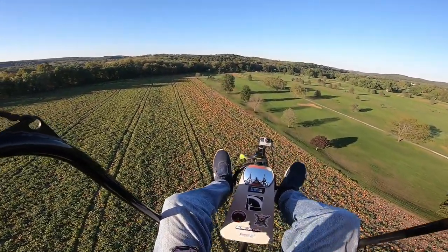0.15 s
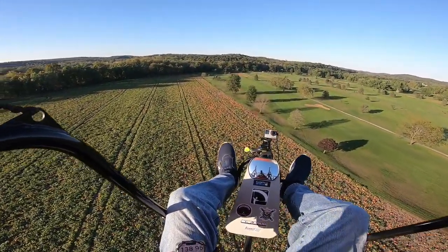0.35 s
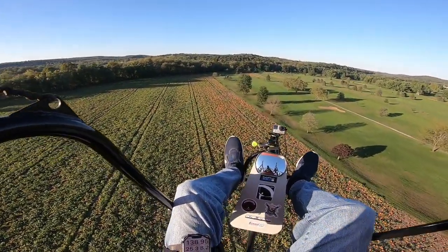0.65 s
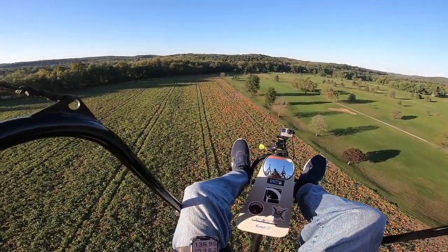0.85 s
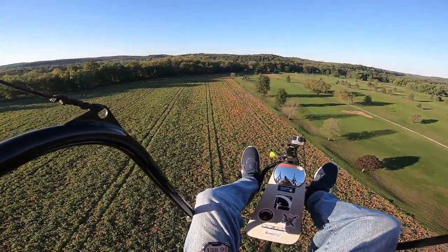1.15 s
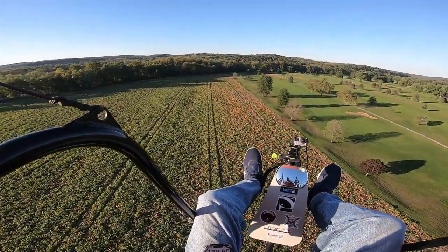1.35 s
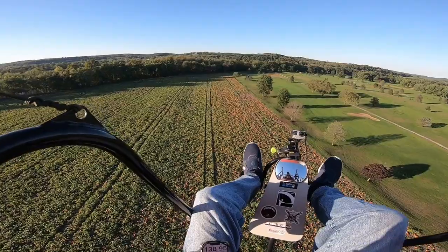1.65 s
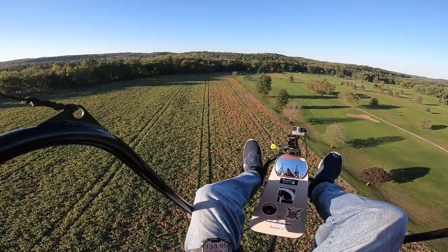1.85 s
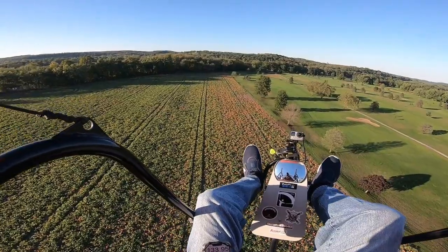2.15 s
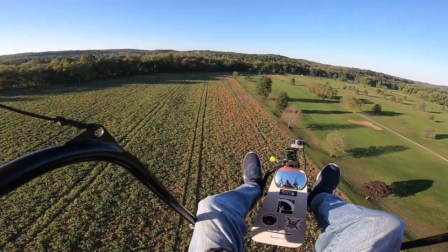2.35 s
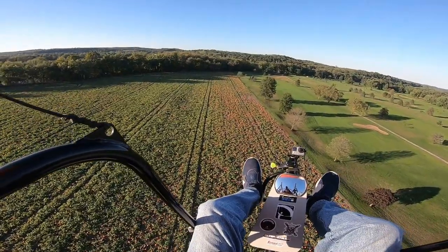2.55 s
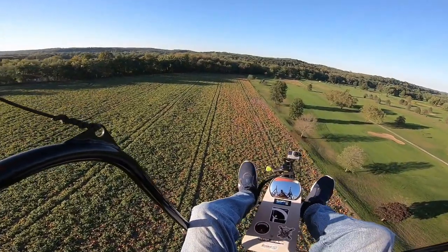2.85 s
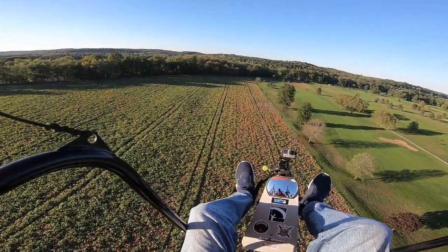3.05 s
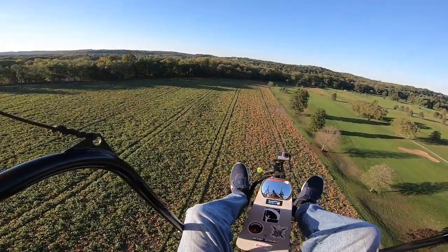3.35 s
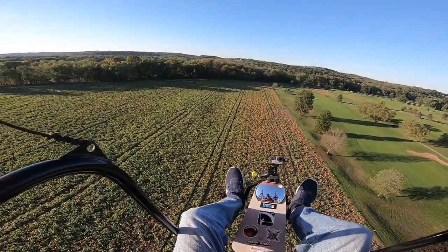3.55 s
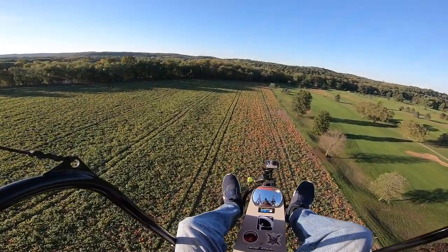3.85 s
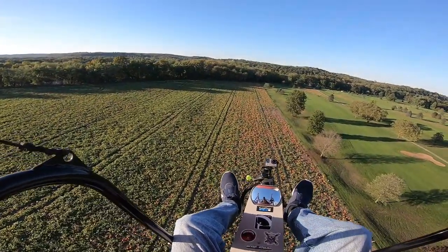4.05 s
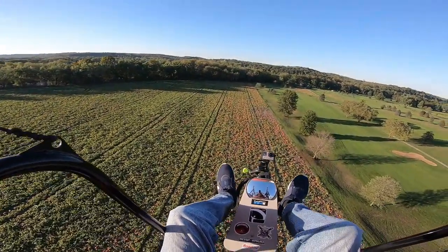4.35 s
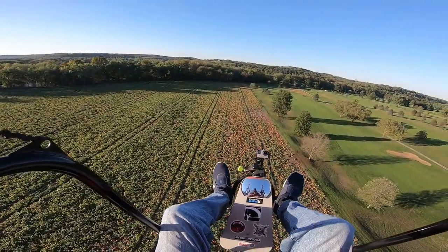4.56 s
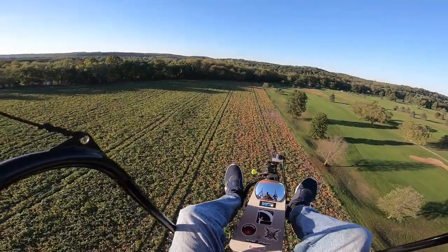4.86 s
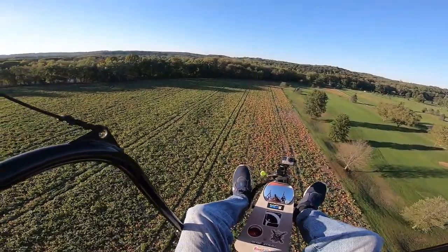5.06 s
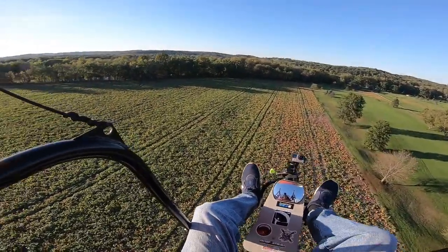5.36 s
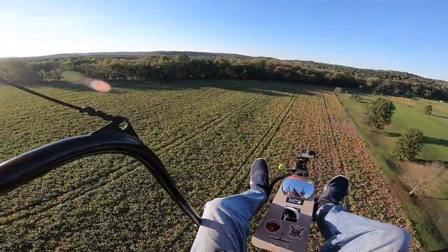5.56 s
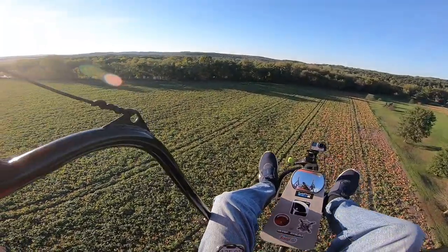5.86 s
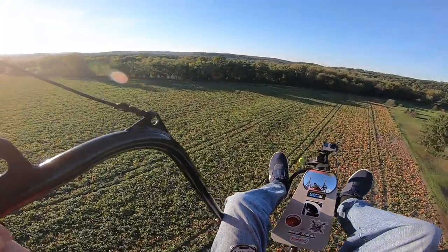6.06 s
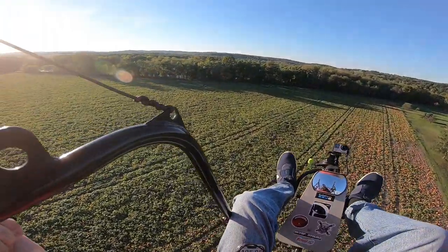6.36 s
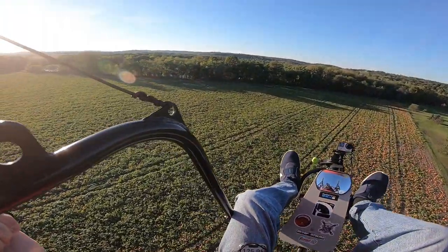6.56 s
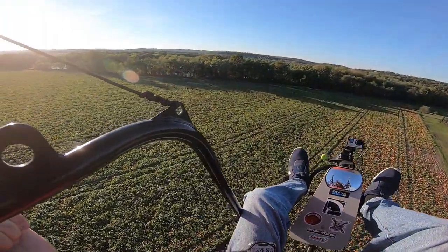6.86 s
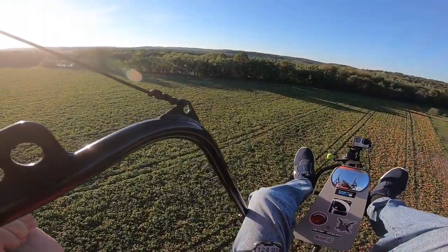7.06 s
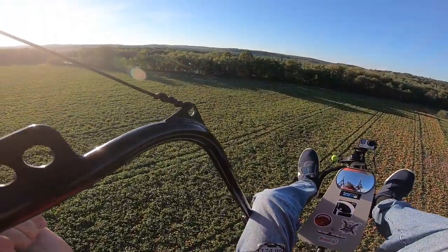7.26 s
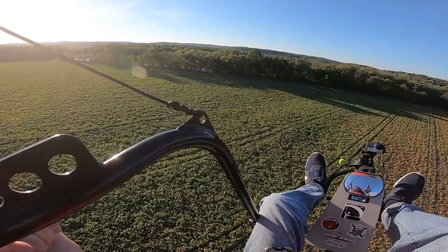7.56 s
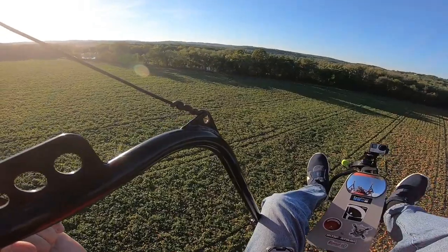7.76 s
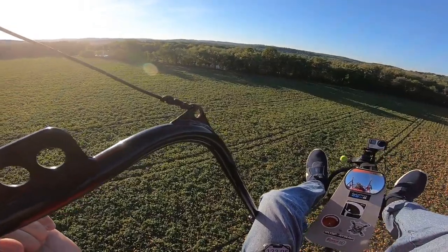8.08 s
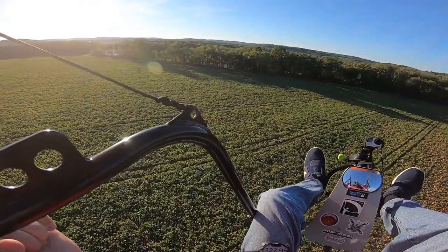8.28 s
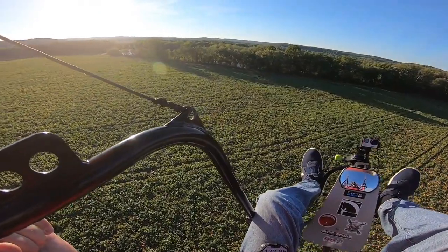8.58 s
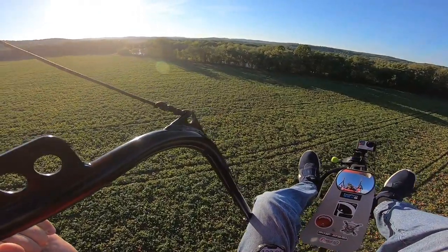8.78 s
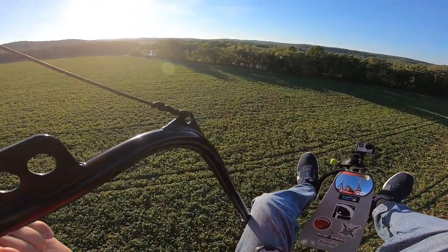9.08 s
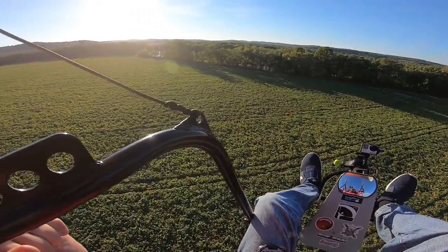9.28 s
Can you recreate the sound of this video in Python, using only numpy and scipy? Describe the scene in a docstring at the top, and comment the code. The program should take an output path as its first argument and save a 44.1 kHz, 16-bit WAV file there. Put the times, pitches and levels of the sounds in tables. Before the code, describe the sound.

Continuous small-engine drone in open air, boxy and muffled on top as through a pilot's headset. A fast, rasping two-stroke bark rides on low, fluttering propeller roar. Revs ease down gently, bottom out late, and recover to the starting pitch. Brief link gaps make little ticks and pitch kinks, several sharp static snaps come mid-way, and thin electronic hiss and buzz stay underneath.

```python
"""A paramotor cruises low over fields, heard through the narrow band of a helmet intercom.
From the start the two-stroke exhaust cracks once a turn, built from harmonics, over a rasp of gas noise.
The geared-down propeller chops noise into a rough wash; the speed sags until about 6.8 s, then recovers.
The drone turns hollow near 1.3, 4.1 and 9 s, and slightly near 6.7 s; crackles come between 4 and 7 s.
Short link dropouts, with a soft bump and a kink in pitch, pause from 4.1 to 6.6 s; hiss and buzz stay on."""
import sys
import numpy as np
from scipy import signal
from scipy.fft import rfft, irfft, next_fast_len
from scipy.io import wavfile
from scipy.ndimage import uniform_filter1d

SR = 44100
rng = np.random.default_rng(int(sys.argv[2]) if len(sys.argv) > 2 else 0)


def inscribe(sig):
    """Save sig as 16-bit PCM at rate SR to the path in sys.argv[1].

    A 1-D sig is mono; a 2-D sig holds one channel per row.
    Samples are clipped to [-1, 1] before scaling.
    """
    pcm = np.round(np.clip(np.atleast_2d(sig).T, -1, 1) * 32767)
    wavfile.write(sys.argv[1], SR, pcm.astype(np.int16))


N = 415422
TIME = np.arange(N) / SR

# engine speed, eased back slowly and then opened up again: t/s, firings per second f/Hz
ENGINE_SPEED = [(0.0, 122.68), (0.55, 121.52), (1.3, 119.95), (2.3, 119.08), (3.8, 116.95), (4.05, 115.92),
                (4.55, 115.07), (5.3, 114.7), (5.8, 114.22), (6.3, 112.9), (6.8, 112.87), (7.55, 114.03),
                (7.8, 114.9), (8.5, 117.6), (8.8, 120.05), (9.42, 123.12)]
# tone colour of the exhaust crack: f/Hz, level/dB
EXHAUST_COLOUR = [(110, -31.5), (240, -22), (360, -19), (470, -19), (570, -0.5), (1300, -2.7), (1600, -2),
                  (2100, -7.8), (2700, -11.8), (3500, -17)]
# tone colour of the low slipstream roar: f/Hz, relative level/dB (per Hz)
WASH_COLOUR = [(25, -32), (70, -22.5), (105, -15), (165, -3.5), (240, 1), (290, -2.5), (400, -18.5),
               (900, -14.5), (3400, -32.5)]
# tone colour of the air churned by the blades: f/Hz, relative level/dB (per Hz)
CHURN_COLOUR = [(100, -23.5), (240, -7), (320, 2), (410, 2.5), (530, -5), (800, -11), (1300, -12),
                (3400, -25.5)]
# tone colour of the exhaust gas rasp: f/Hz, relative level/dB (per Hz)
RASP_COLOUR = [(150, -15.5), (450, -8.5), (900, -1.5), (1400, -4), (1900, -7), (2600, -10), (3300, -10),
               (3600, -19)]
# tone colour of the electronic hiss: f/Hz, relative level/dB (per Hz)
HISS_COLOUR = [(1000, -57), (4500, 2.5), (8000, 1), (8350, 1), (8570, 5.5), (8800, 0.5), (11000, -0.5),
               (15000, -0.5)]
# tone colour of the electronic buzz: f/Hz, relative level/dB (per Hz)
BUZZ_COLOUR = [(4000, -17), (10000, -18), (12400, -13), (13800, -15), (14350, -10), (14650, -2), (15250, 0),
               (15450, -30)]
# strength of the buzz before each side's own offset: t/s, level/dB
BUZZ_LEVEL = [(0, -75), (2.5, -77), (5.5, -73.5), (8, -71.5), (9.42, -75)]
# breaks in the link, mostly on a half-second beat:
# t/s, length/s, bump level/dB before smoothing, lateness of the sound afterwards/s
LINK_DROPOUTS = [(0.051, 0.0026, -49, 0.0042), (0.061, 0.0074, -32, 0.003), (0.556, 0.0041, -46, 0.0025),
                 (0.57, 0.0056, -35, 0.0019), (1.055, 0.0032, -28, 0.0013), (1.554, 0.0047, -45, .0042),
                 (2.055, 0.0039, -33, 0.0029), (2.554, 0.0035, -32, 0.0012), (3.061, 0.0041, -32, 0.0032),
                 (3.555, 0.0036, -42, 0.0037), (3.566, 0.0043, -36, 0.0017), (4.055, 0.0065, -19.5, 0.0037),
                 (4.093, 0.0023, -30, 0.00207), (6.648, 0.017, -32, .0032), (7.053, 0.0022, -40, 0.00072),
                 (7.56, 0.0042, -27, 0.0035), (8.055, 0.0037, -32, 0.0025), (8.553, 0.0037, -37, 0.0029),
                 (9.061, 0.0036, -44, 0.0031)]
# crackles and knocks on the line, levels before filtering:
# t/s, snap level/dB, tail level/dB, tail decay/s, centre f/Hz, width/octaves
LINE_CRACKLES = [(4.063, -17, -29, 0.076, 652, 1), (4.9548, -12.5, -35, .003, 1090, 1.2),
                 (5.3565, -19.5, -39, .003, 1300, 3.5), (5.3652, -20, -32, 0.0037, 2860, 0.81),
                 (6.663, -13, -32, 0.004, 1440, 0.87), (6.668, -19, -24, .004, 280, 2.3),
                 (6.8877, -15.5, -40, .003, 900, 1.3)]
# loudness of the exhaust (its bark), before the crack and rasp offsets: t/s, level/dB
BARK_LEVEL = [(0, -42), (1.1, -43.5), (1.45, -47), (2.1, -41.5), (2.7, -43), (3.3, -42), (3.8, -43.5),
              (4.7, -46), (5.4, -43), (5.9, -45.5), (6.5, -44.5), (7, -45.5), (8.3, -45), (9.42, -45.5)]
# loudness of the blade churn, weakest around the slowest stretch: t/s, level/dB
CHURN_LEVEL = [(0, -37), (1.4, -36), (1.9, -36.5), (2.3, -36), (3.6, -38.5), (4.8, -39.5), (5.5, -38.5),
               (5.9, -40), (6.6, -43.5), (8.2, -41.5), (8.9, -38.5)]
# spells in which the drone turns hollow and the wash thins: start t/s, end t/s, depth/0-1
HOLLOW_SPELLS = [(1.337, 2.234, 0.62), (4.144, 5.006, 0.8), (6.715, 7.113, 0.17), (9.02, 9.7, 0.3)]
# strongest exhaust harmonics, before the tone colour:
# multiple of the firing rate, level over the bark/dB, change at full hollowness/dB
DRONE_HARMONICS = [(5, 2.5, -10), (6, -8, 10.5), (7, -3.5, -19), (8, 0.26, -8), (9, -5, 4.5), (10, -4, -3),
                   (11, -4.5, -8.5)]
# level changes of single harmonics: start t/s, end t/s, multiple of the firing rate, change/dB
HARMONIC_SWELLS = [(-0.2, 0.59, 7, -8), (3.0, 3.8, 9, 5.5), (3.0, 3.46, 8, -13), (3.4, 4.3, 11, -14),
                   (3.75, 4.1, 7, 4.5), (4.95, 6.2, 8, 2.5), (5.1, 5.702, 5, 0), (5.1, 6.9, 11, 1),
                   (6.3, 5.8, 11, 11), (7.402, 8.3, 8, -8), (7.5, 8.8, 6, -22), (7.7, 10.6, 13, 3),
                   (8.2, 8.6, 11, 4), (8.9, 11, 4, 22), (-0.2, 3.1, 14, 1.5), (1.9, 3.6, 13, 0.5),
                   (4.9, 7.6, 14, 1.5), (7.4, 7.8, 9, 3), (4.1, 5.14, 12, 3), (8.1, 8.6, 10, 3),
                   (9.1, 9.6, 6, 5)]
# tilt of the exhaust treble, which sets how sharp the crack is: t/s, slope/dB per octave
TREBLE_TILT = [(0, -5), (1.5, -3), (2.3, -3.2), (3.3, -3), (4.2, -5.5), (5.5, -5.5), (7, -12), (8.7, -6),
               (9.42, -7)]

INTERCOM_HZ, CUTOFF_HZ = 3546, 15300  # top of the intercom's band; top of everything heard
LEFT_LAG_MS = 0.12
BUZZ_PULSES_PER_S = 59.945
CATCH_UP_SHARE = .045  # playing this much too fast makes up for the lateness
BLADE_PASSES_PER_FIRING = .923
HOLLOW_FADE_S = 0.27
WASH_DB, WASH_HOLLOW_DB = -37, -3  # usual level; change at full hollowness
JET_DB, CRACK_DB = -.6, -6.6  # the gas rasp and the weaker harmonics, over the bark
SPURT_DB, SPURT_ECHO_DB = 5.5, -3  # the spurt of gas and its echo, over the steady rush
JET_WIDTH_TURNS, JET_ECHO_WIDTH_TURNS = .045, .09  # length of the spurt and of its echo
ECHO_TURNS = .6  # delay of the exhaust echo
CRACK_WIDTH_TURNS, BURN_SCATTER_DB = .07, 2.0  # length of the crack; spread of its strength
TIMING_SCATTER_TURNS = .002
TILT_FROM_MULTIPLE = 11  # harmonics above this one get the treble tilt
LINE_WAVER_DB, LINE_WAVERS_PER_S = 1.0, 1.03


def from_db(db):
    """Turn decibels into a gain."""
    return 10 ** (np.asarray(db) / 20)


def rms_one(x):
    """Scale to unit power."""
    return x / np.sqrt(np.mean(x ** 2) + 1e-20)


def in_time(rows):
    """Read each column of a timed curve at every sample."""
    s, *columns = np.transpose(rows)
    return [np.interp(TIME, s, column) for column in columns]


def drift(rate):
    """Wander smoothly at random with a spread of one, from noise smoothed at every 40th sample."""
    r = np.exp(-80 * np.pi * rate / SR)
    noise = rng.standard_normal(N // 40 + 2002)
    slow = signal.lfilter([1], [1, -2 * r, r * r], noise)[2000:]  # skip the filter's start
    return np.interp(np.arange(N) / 40, np.arange(len(slow)), rms_one(slow))


def colour(x, spectrum):
    """Filter to the given gain curve without any sound ahead of its cause (minimum phase)."""
    size = next_fast_len(N + SR // 10, True) * 2
    hz, db = np.transpose(spectrum)
    bin_hz = np.arange(size // 2 + 1) * SR / size
    gain_db = np.interp(np.log(bin_hz + 1), np.log(hz), db)
    cepstrum = irfft(np.log(from_db(gain_db)))
    # folding the later half away leaves only a response after the cause
    cepstrum[1:size // 2] *= 2
    cepstrum[size // 2 + 1:] = 0
    return irfft(rfft(x, size) * np.exp(rfft(cepstrum)))[..., :N]


def per_cycle(turns):
    """Draw a fresh random value for each cycle, joined by straight lines."""
    values = rng.standard_normal(N // 100)
    return np.interp(turns, np.arange(len(values)), values)


def puffs(turns, sharpness):
    """Swell once a cycle, at unit power."""
    return rms_one(np.exp(sharpness * np.cos(2 * np.pi * turns)))


def burst(turns, width_turns):
    """Draw a bell of height one around each firing."""
    return np.exp(-.5 * (((turns + .5) % 1 - .5) / width_turns) ** 2)


def spell(start, end):
    """Fade in, hold and fade out between 0 and 1."""
    return np.clip(np.minimum(TIME - start, end - TIME) / HOLLOW_FADE_S + .5, 0, 1)


def hollowness():
    """Tell how hollow the drone is at every sample."""
    return sum(depth * spell(start, end) for start, end, depth in HOLLOW_SPELLS)


def electronics(hiss_db=-68.5, shared=0.16, smear_s=0.0072):
    """Steady hiss, partly common to both sides, and a thin buzz of smeared, alternating pulses."""
    hiss = rng.standard_normal((2, N)) + shared * rng.standard_normal(N)
    pulses = np.diff(np.floor(TIME * BUZZ_PULSES_PER_S) % 2, prepend=0)
    smear = rng.standard_normal(SR // 10) * np.exp(-TIME[:SR // 10] / smear_s)
    smeared = signal.fftconvolve(pulses, smear)[:N]
    buzz_db, = in_time(BUZZ_LEVEL)
    side_db = np.array([[-3.5], [.5]])  # left, right
    buzz = from_db(buzz_db + side_db) * rms_one(colour(smeared, BUZZ_COLOUR))
    return from_db(hiss_db) * rms_one(colour(hiss, HISS_COLOUR)) + buzz


def crackles():
    """Brief spits of static: a snap and a fizzing tail, each pair in its own band."""
    static = np.zeros(N)
    for s, snap_db, tail_db, decay, hz, octaves in LINE_CRACKLES:
        snap = from_db(snap_db) * np.sinc(2 * INTERCOM_HZ * (TIME - s))
        tail = from_db(tail_db) * (TIME >= s) * np.exp(-abs(TIME - s) / decay)
        # louder noise, so that the part inside the intercom's band has the tail's level
        fizz = tail * rng.standard_normal(N) * np.sqrt(SR / 2 / INTERCOM_HZ)
        edges = np.minimum(hz * 2 ** (octaves * np.array([-.5, .5])), CUTOFF_HZ)
        band = signal.butter(2, edges, "band", fs=SR, output="sos")
        static += signal.sosfilt(band, snap + fizz)
    return static


def broken_link(x, coupling_hz=45, settle_ms=0.82, settle_s=0.12, faint_db=-21):
    """The line sticks at a value that leaks away; sound resumes late, runs fast and high, then settles."""
    alive, stuck, late_s = np.ones(N), np.zeros(N), np.zeros(N)
    for s, length, bump_db, late in LINK_DROPOUTS:
        start, end = round(s * SR), round((s + length) * SR)
        alive[start:end] = from_db(faint_db)  # the sound drops to a faint level during the break
        stuck[start:end] = from_db(bump_db)
        since = TIME[:N - end]
        catching_up = late - CATCH_UP_SHARE * since
        settling = settle_ms / 1000 * np.exp(-since / settle_s)
        late_s[end:] = np.maximum(catching_up, settling)
    delayed = np.array([np.interp(TIME - late_s, TIME, side) for side in x])
    coupling = signal.butter(1, coupling_hz, "high", fs=SR, output="sos")
    bumps = signal.sosfilt(coupling, uniform_filter1d(stuck, size=70))
    return delayed * uniform_filter1d(alive, size=20) - bumps + crackles()


def turbulence(turns, spectrum, sharpness, evenness):
    """Air noise in a puff per blade; its level is evened, so the roar has few gaps or lumps."""
    noise = rng.standard_normal(N) * puffs(turns, sharpness)
    air = rms_one(colour(noise, spectrum))
    power = uniform_filter1d(uniform_filter1d(air ** 2, size=600), size=600)
    return rms_one(air / (power + .01) ** (evenness / 2))


def jet(turns, gust_db=.6):
    """Rasp of the exhaust gas: a short spurt at each firing and a weaker echo over a steady rush."""
    spurt = from_db(SPURT_DB) * burst(turns, JET_WIDTH_TURNS)
    echo = from_db(SPURT_ECHO_DB) * burst(turns - ECHO_TURNS, JET_ECHO_WIDTH_TURNS)
    gusts = from_db(gust_db * drift(17))
    return rms_one(colour(rng.standard_normal(N) * (1 + spurt + echo) * gusts, RASP_COLOUR))


def exhaust(turns, bark_db, hollow, pipe_echo=0.3):
    """A pressure spike per firing, echoed in the tuned pipe; burns vary in strength and timing."""
    drone_db = {}
    for k, db, change_db in DRONE_HARMONICS:
        waver_db = LINE_WAVER_DB * drift(LINE_WAVERS_PER_S)
        drone_db[round(k)] = bark_db + db + change_db * hollow + waver_db
    angle = 2 * np.pi * (turns + TIMING_SCATTER_TURNS * per_cycle(turns))
    tilt_db, = in_time(TREBLE_TILT)
    spikes = np.zeros(N)
    for k in range(1, 32):  # multiples of the firing rate
        echo = 1 + pipe_echo * np.exp(-2j * np.pi * k * ECHO_TURNS)
        if k in drone_db:
            gain = from_db(drone_db[k])
        else:
            gain = abs(echo) * from_db(bark_db + CRACK_DB)
        swell_db = sum(db * spell(start, end)
                       for start, end, multiple, db in HARMONIC_SWELLS if round(multiple) == k)
        treble_db = tilt_db * max(np.log2(k / TILT_FROM_MULTIPLE), 0)
        wave = np.sqrt(2) * np.cos(k * angle + np.angle(echo))
        spikes += gain * from_db(swell_db + treble_db) * wave
    burn_db = BURN_SCATTER_DB * np.minimum(per_cycle(turns), 1)  # strong burns are capped
    return colour(spikes * from_db(burn_db * burst(turns, CRACK_WIDTH_TURNS)), EXHAUST_COLOUR)


def scene():
    """Propeller and exhaust, locked together by the reduction drive."""
    firing_hz, = in_time(ENGINE_SPEED)
    bark_db, = in_time(BARK_LEVEL)
    churn_db, = in_time(CHURN_LEVEL)
    hollow = hollowness()
    turns = np.cumsum(firing_hz) / SR
    blades = turns * BLADE_PASSES_PER_FIRING
    wash_gain = from_db(WASH_DB + WASH_HOLLOW_DB * hollow)
    wash = wash_gain * turbulence(blades, WASH_COLOUR, sharpness=0.064, evenness=0.37)
    churn = from_db(churn_db) * turbulence(blades, CHURN_COLOUR, sharpness=0.19, evenness=0.24)
    rasp = from_db(bark_db + JET_DB) * jet(turns)
    helmet = exhaust(turns, bark_db, hollow) + rasp + wash + churn
    return np.array([helmet, helmet])


def record(dry, right_bass_cut_hz=5):
    """The intercom passes a narrow band; the left comes slightly late, the right sheds its deepest bass."""
    intercom = signal.ellip(8, .5, 60, INTERCOM_HZ, fs=SR, output="sos")
    left, right = signal.sosfilt(intercom, broken_link(dry))
    left = np.interp(TIME - LEFT_LAG_MS / 1000, TIME, left)
    bass_cut = signal.butter(1, right_bass_cut_hz, "high", fs=SR, output="sos")
    right = signal.sosfilt(bass_cut, right)
    top_cut = signal.ellip(10, .3, 70, CUTOFF_HZ, fs=SR, output="sos")
    return signal.sosfilt(top_cut, np.array([left, right]) + electronics())


dry = scene()
out = record(dry)
inscribe(out)
```